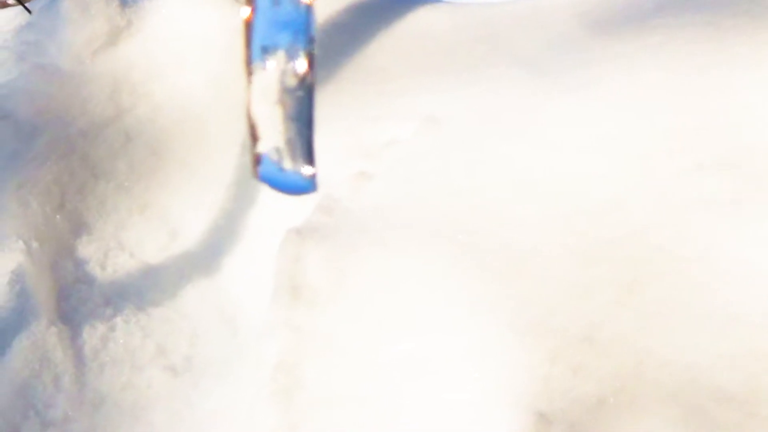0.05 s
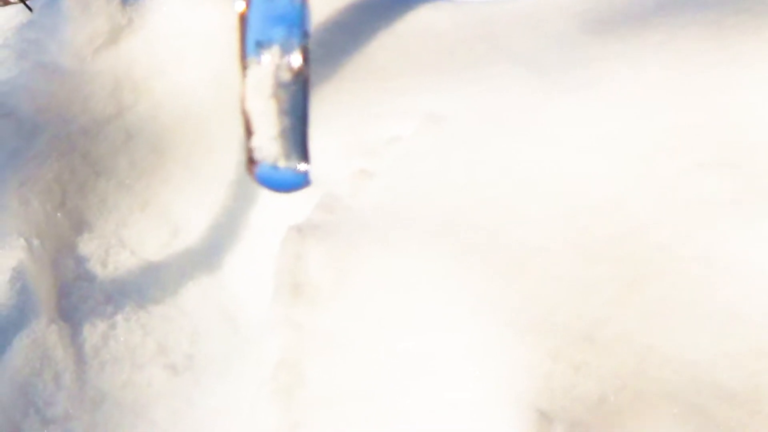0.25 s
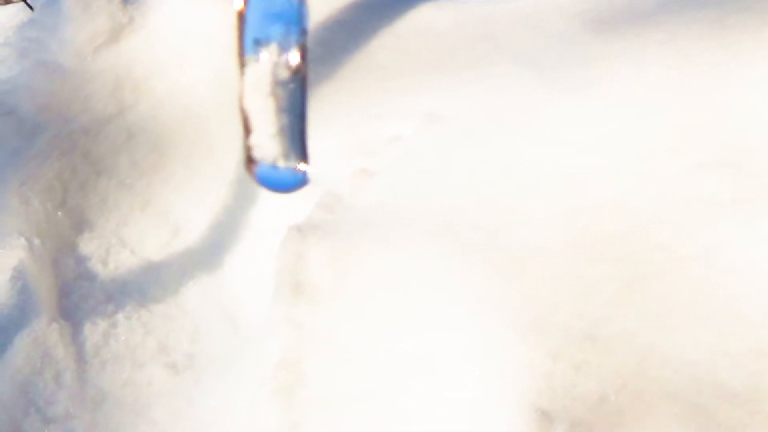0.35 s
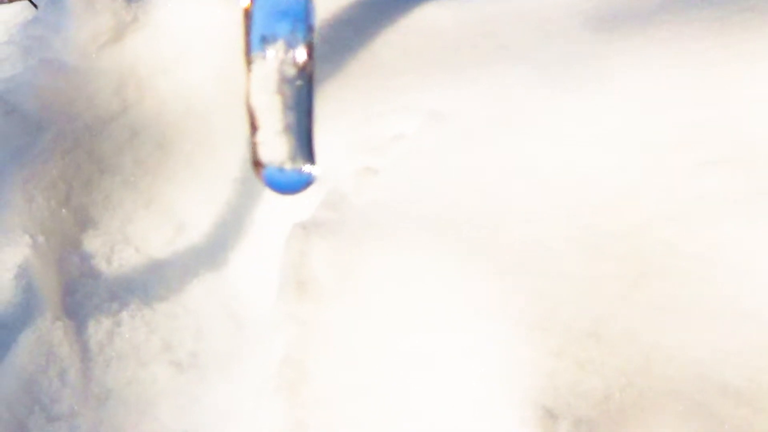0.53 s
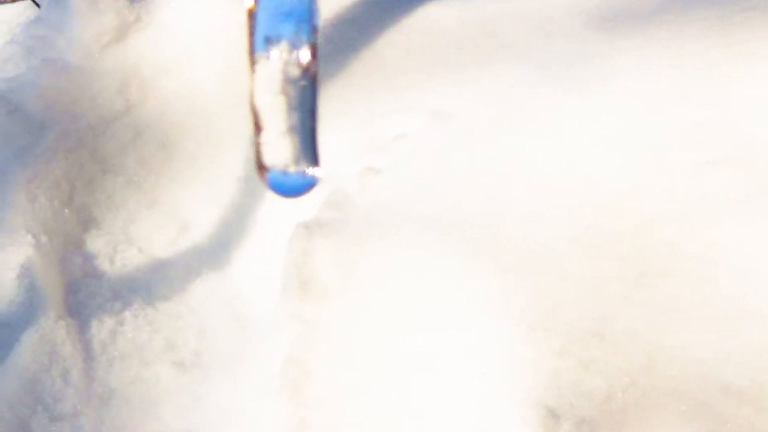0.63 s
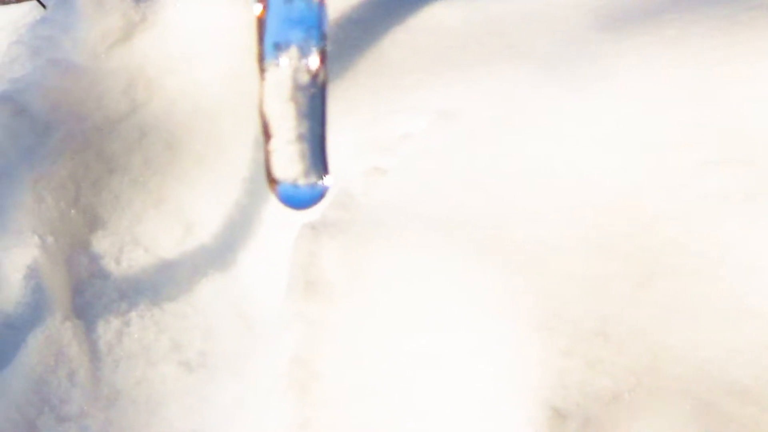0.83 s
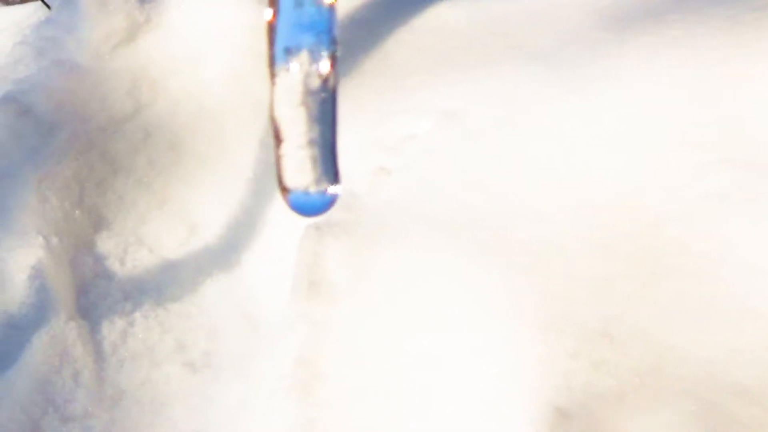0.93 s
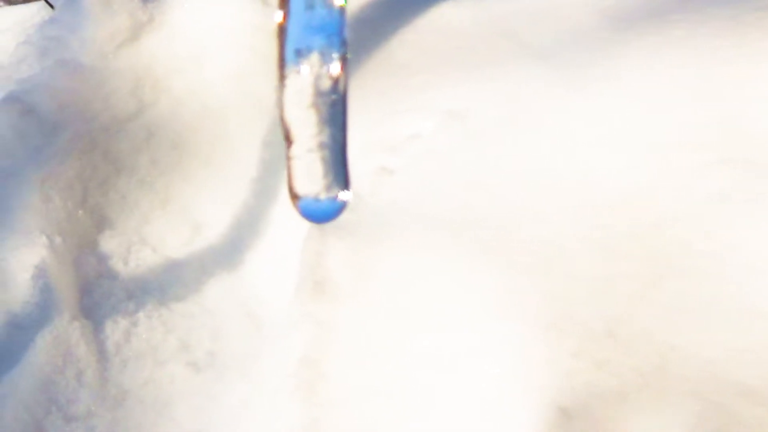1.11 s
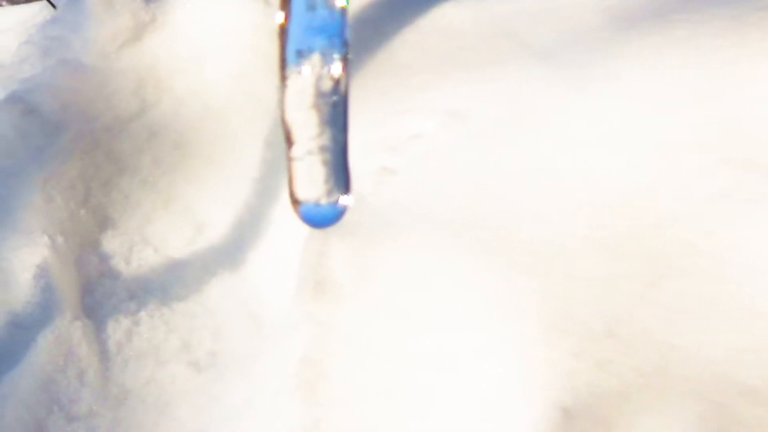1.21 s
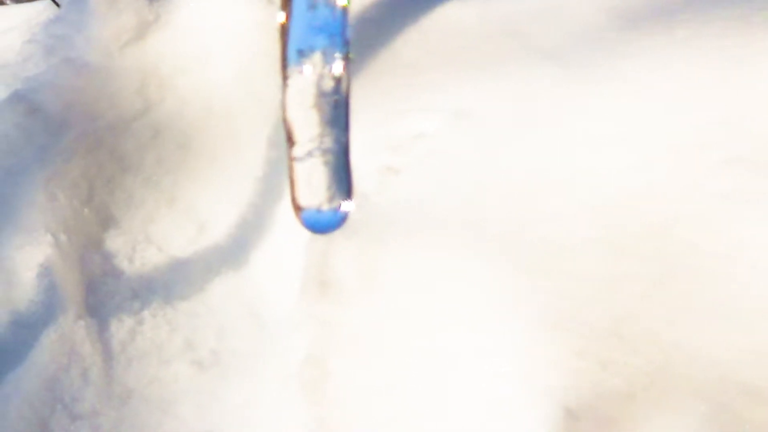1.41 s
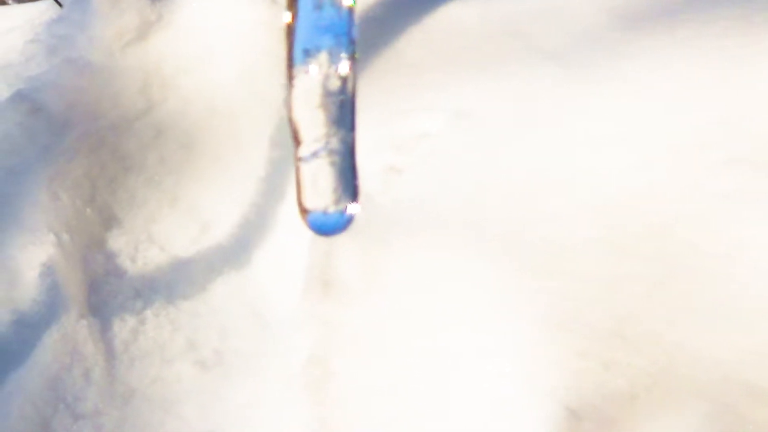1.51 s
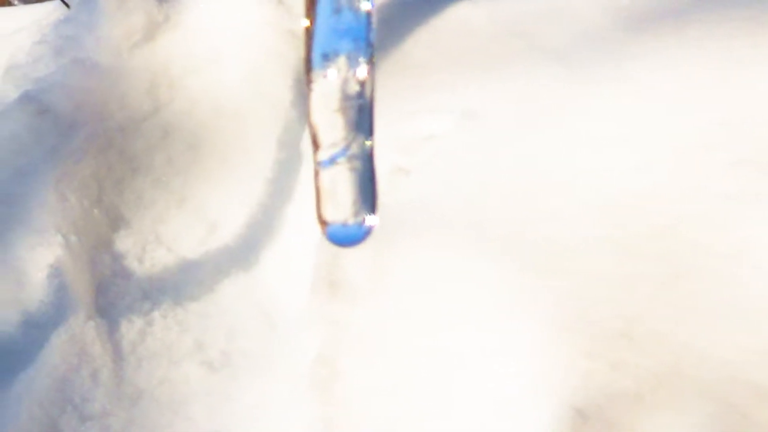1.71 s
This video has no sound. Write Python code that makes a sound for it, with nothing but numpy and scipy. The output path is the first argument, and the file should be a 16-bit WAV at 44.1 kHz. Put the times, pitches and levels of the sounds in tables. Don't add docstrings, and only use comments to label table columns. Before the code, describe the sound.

Close drip sounds in a still snowy yard: small clicks and hollow plops build quickly to a loud wet snap, a short reflection fades, then mostly soft hiss and a far low throb, with barely audible late drips.

```python
import sys
import numpy as np
from scipy import signal
from scipy.fft import rfft, irfft, next_fast_len
from scipy.io import wavfile

SR = 44100
rng = np.random.default_rng(int(sys.argv[2]) if len(sys.argv) > 2 else 0)


def how_loud(loudness_db):
    steps = np.asarray(loudness_db, float) / 20
    return 10 ** steps


def transcribe(signal):
    frames = np.atleast_2d(signal).T
    limited = np.clip(frames, -1, 1)
    pcm = np.round(limited * 32767).astype(np.int16)
    wavfile.write(sys.argv[1], SR, pcm)


N = 77175
OPPOSITE = np.array([[1], [-1]])


def unit(x):
    return x / np.sqrt(np.mean(x ** 2) + 1e-20)


def along(points, hz):
    f, value = np.transpose(points)
    return np.interp(np.log(hz + 1), np.log(f + 1), value)


def near(hz, centre_hz, octaves):
    return np.exp(-.5 * (np.log2((hz + 1) / centre_hz) / octaves) ** 2)


def filtered(x, response):
    m = next_fast_len(x.shape[-1] + SR // 4)
    hz = np.fft.rfftfreq(m, 1 / SR)
    return irfft(rfft(x, m) * response(hz), m)[..., :x.shape[-1]]


def band(hz, width_hz):
    noise = rng.standard_normal(N)
    return unit(filtered(noise, lambda f: np.exp(-.5 * ((f - hz) / width_hz) ** 2)))


def ring(t, hz, t60, rise_s):
    roughness, rough_hz = .2, 60
    shake = filtered(rng.standard_normal((2, len(t))), lambda f: near(f, rough_hz, 1.09))
    size, turn = roughness * unit(shake)
    envelope = how_loud(-60 * t / t60) * (1 - np.exp(-t / rise_s)) ** 2
    return np.sin(2 * np.pi * hz * t + turn) * (1 + size) * envelope


# frequency in Hz, level in dB, noise width in Hz, noise share as a ratio.
ENGINE_ORDERS = [(25, -65, 2, .35), (50, -62, 6, .9), (75, -67, 9, 1.3), (132, -76, 8, 2)]
# frequency in Hz, level in dB, width in Hz.
ENGINE_DRONE = [(296, -74.5, 15.4), (404, -72, 21)]
# time in seconds, throb level in dB, drone level in dB.
ENGINE_SWELL = [
    (0, -1.5, 3.5),
    (.3, 0, -6.5),
    (.6, -3.5, -2.5),
    (.85, -0.5, -0.5),
    (1.1, 1, -1),
    (1.4, 2.5, 1.5),
    (1.75, 0.5, 3.5),
]


def engine():
    s, *levels = np.transpose(ENGINE_SWELL)
    t = np.arange(N) / SR
    throb, hum = [how_loud(np.interp(t, s, db - db.mean())) for db in levels]
    orders = []
    for hz, db, width_hz, noise_share in ENGINE_ORDERS:
        tone = np.sin(2 * np.pi * hz * t)
        orders.append(how_loud(db) * unit(tone + noise_share * band(hz, width_hz)))
    idle, *swelling = orders
    drone = 0
    for hz, db, width_hz in ENGINE_DRONE:
        drone = drone + how_loud(db) * (band(hz, width_hz) + 0.91 * band(hz, width_hz) * OPPOSITE)
    return idle + throb * sum(swelling) + hum * drone


# frequency in Hz, density in dB per Hz.
AIR_SHARED = [(60, -23), (100, -2.5), (140, -4.5), (450, -8), (600, -11.5), (4500, -21), (9900, -28.5),
              (10400, -27)]
# frequency in Hz, density in dB per Hz.
AIR_DIFFERENCE = [(35, -36), (60, -16.5), (168, 0.5), (283, -9), (314, -6.5), (531, -3), (712, -3),
                  (5110, -24.5), (9000, -46), (11700, -84), (19800, -120)]


def air():
    shared_db, difference_db = -62, -68
    mid = unit(filtered(rng.standard_normal(N), lambda f: how_loud(along(AIR_SHARED, f))))
    side = unit(filtered(rng.standard_normal(N), lambda f: how_loud(along(AIR_DIFFERENCE, f))))
    return how_loud(shared_db) * mid + how_loud(difference_db) * side * OPPOSITE


# start in seconds, peak in dB, frequency in Hz, t60 in seconds.
HOLLOW_PUSHES = [(.2258, -38, 1000, .1), (.2425, -45, 1040, .4), (.2515, -43, 1100, .035),
                 (.2630, -53, 1100, .1), (.2720, -43.5, 1140, .03), (.2795, -51, 1100, .12),
                 (.3082, -41, 1140, .5), (.3266, -32, 1010, .06), (.3334, -34, 1088, .11),
                 (.664, -61, 1000, .02), (1.6578, -50, 650, .009), (1.6655, -51, 850, .01),
                 (1.669, -59, 1450, .012), (1.727, -57, 1100, .012), (1.731, -61, 2000, .09)]


def hollow():
    rise_s, damp_s = .0011, .0012
    out, t = np.zeros(N + SR), np.arange(SR // 4) / SR
    gaps_s = np.diff([row[0] for row in HOLLOW_PUSHES], append=N / SR + 1)
    for (s, db, hz, t60), gap_s in zip(HOLLOW_PUSHES, gaps_s):
        until_next = (1 - np.tanh((t - gap_s + damp_s) / damp_s)) / 2
        note = ring(t, hz, t60, rise_s) * until_next
        out[round(s * SR):][:len(t)] += how_loud(db) * note / np.abs(note).max()
    return out[:N]


# start in seconds, # peak in dB, centre frequency in Hz, decay in cycles, spray level in dB relative to the
DROP_CONTACTS = [(0.2265, -49, 5400, 3, -5), (.2270, -46, 2840, 1.7, -4.5), (0.2293, -34, 5040, 3.3, -22),
                 (0.231, -43, 5470, 22, -18), (0.233, -45, 1590, 3.2, -5), (.2420, -71, 5400, 9, -8),
                 (0.2708, -45.5, 1680, 1.8, -8.5), (.2920, -52, 1530, 1.3, -6),
                 (.3075, -44.5, 4320, 6.7, -2), (0.3101, -40, 2960, 2.1, -13), (.3130, -47, 1630, 6, -10),
                 (.3210, -37, 3840, 3.2, -4), (0.3246, -47, 10600, 2, -31), (0.3274, -17, 5310, 5.7, -15.5),
                 (0.329, -23.5, 3830, 1.9, -16), (0.331, -23.5, 3930, 3, -19),
                 (0.3344, -30.5, 4270, 5.1, -7), (0.3354, -26.5, 2440, 4, -12.5),
                 (0.339, -31, 2780, 2.6, -19), (0.3394, -33.5, 1880, 2.2, -13),
                 (.3462, -33.5, 2460, 1.5, -7), (.3280, -48.5, 924, 32, -30), (.666, -55, 1940, 3, -10),
                 (0.2718, -54, 3780, 3, -15)]


def taps():
    rise_cycles, spray_t60, spray_octaves = 1.4, .04, .33
    out, t = np.zeros(N + SR), np.arange(SR // 6) / SR
    for s, db, hz, cycles, spray_db in DROP_CONTACTS:
        rise = (1 - np.exp(-t * hz / rise_cycles)) ** 2
        click = np.sin(2 * np.pi * hz * t) * how_loud(-20 * t * hz / cycles) * rise
        spray = unit(filtered(rng.standard_normal(len(t)), lambda f: near(f, hz, spray_octaves)))
        spray = rise * spray * how_loud(spray_db - 60 * t / spray_t60)
        out[round(s * SR):][:len(t)] += how_loud(db) * (click / np.abs(click).max() + spray)
    return out[:N]


# frequency in Hz, level in dB, t60 in seconds.
CRUST_MODES = [(1465, -11, .12), (1640, -11, .1), (1786, -10, .09), (1892, 0, .085), (2160, -10, .08),
               (2272, -10, .12), (2555, -4, .05), (2944, -4, .05), (3064, -2, .06), (3517, -3, .065),
               (3990, -6, .05), (4141, -4, .065), (4362, -7, .08), (5200, -7, .045)]
# start in seconds, level in dB, centre frequency in Hz.
CRUST_BLOWS = [
    (.2290, -53.5, 5030),
    (.2710, -64, 1680),
    (.3080, -47.5, 3600),
    (0.313, -44.5, 1700),
    (0.3284, -30.5, 4060),
    (.3360, -32, 1960),
]


def crust():
    rise_s, reach_octaves = .0006, .5
    out, t = np.zeros(N + SR), np.arange(SR // 6) / SR
    for s, db, centre_hz in CRUST_BLOWS:
        ringing = np.zeros(len(t))
        for hz, level_db, t60 in CRUST_MODES:
            share = how_loud(level_db) * near(hz, centre_hz, reach_octaves)
            ringing += share * ring(t, hz, t60, rise_s)
        out[round(s * SR):][:len(t)] += how_loud(db) * ringing
    return out[:N]


# frequency in Hz, t60 in seconds.
YARD_DECAY = [(800, 0.16), (1500, 0.36), (2500, 0.32), (5500, 0.27), (9000, 0.1)]


def yard(x):
    delay = 150
    hz, t, z = signal.stft(rng.standard_normal((2, SR // 3)), SR, nperseg=128)
    decay = how_loud(-60 * t / along(YARD_DECAY, hz)[:, None])
    tail = signal.istft(z * decay, SR, nperseg=128)[1]
    tail = tail[0] + 0.36 * tail[1] * OPPOSITE
    tail = tail / np.linalg.norm(tail[0])
    return signal.fftconvolve(np.pad(x, (delay, 0))[None], tail, axes=1)[:, :N]


def scene():
    yard_db, lag_s = -19, 2.5e-6
    background = engine() + air()
    drops = hollow() + taps() + crust()
    near_pair = filtered(drops, lambda hz: np.exp(2j * np.pi * hz * lag_s * OPPOSITE))
    return near_pair * how_loud([[-.3], [.3]]) + how_loud(yard_db) * yard(drops) + background


def top_cut(x):
    return signal.sosfilt(signal.butter(12, 10270, fs=SR, output="sos"), x)


def record(dry):
    top_hz = 10150
    mix = filtered(dry, lambda hz: 1 / (1 + (hz / top_hz) ** 60))
    return top_cut(mix)


dry = scene()
out = record(dry)
transcribe(out)
```